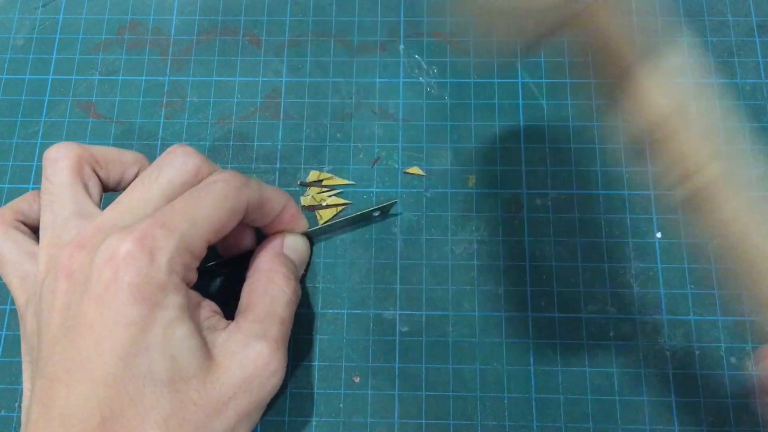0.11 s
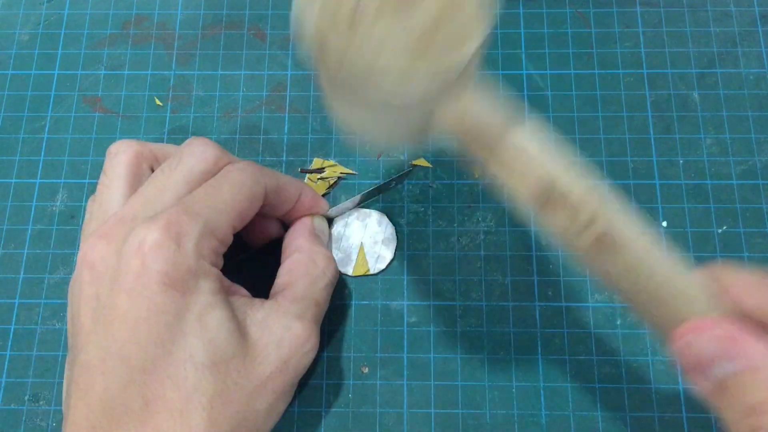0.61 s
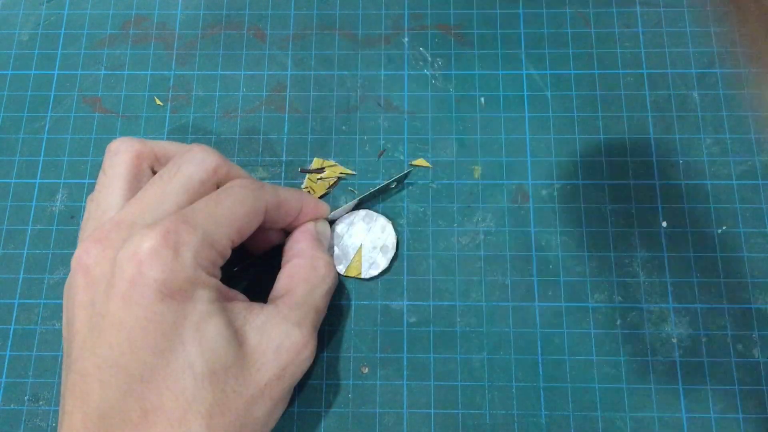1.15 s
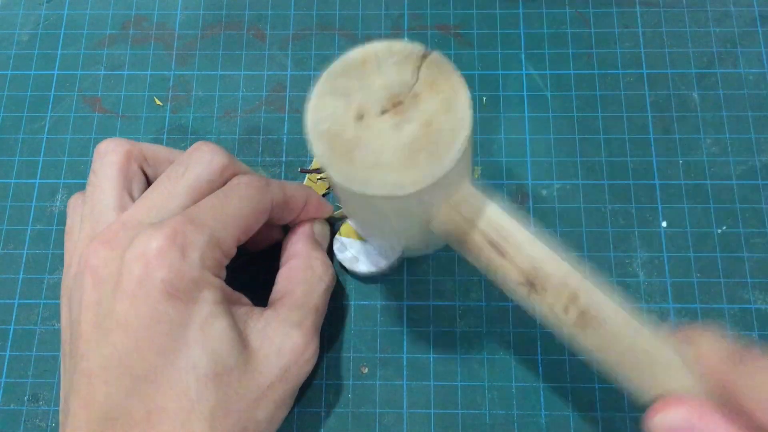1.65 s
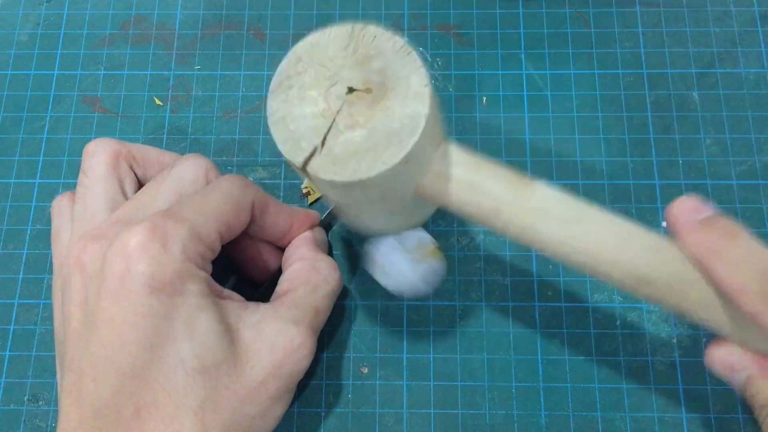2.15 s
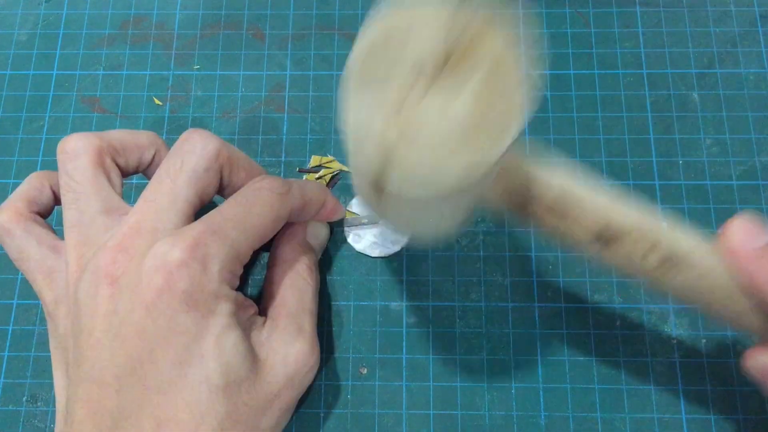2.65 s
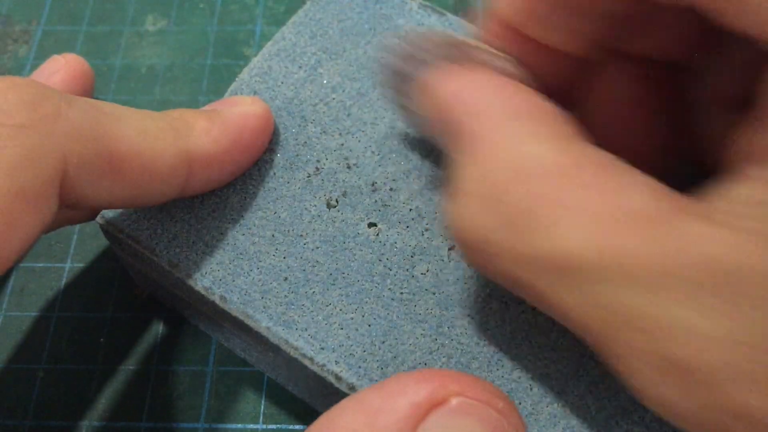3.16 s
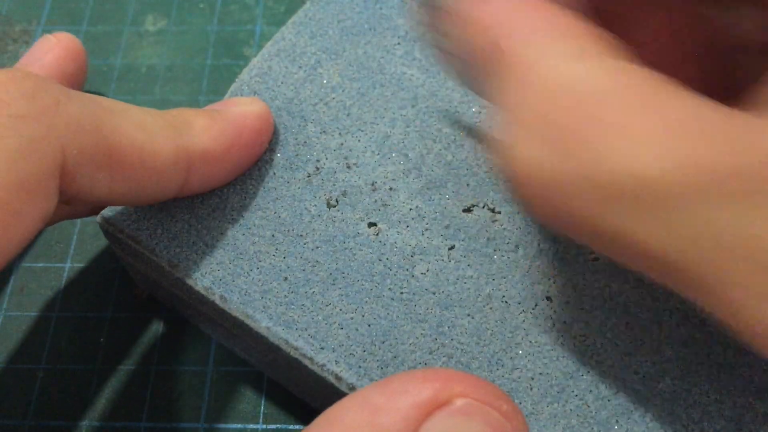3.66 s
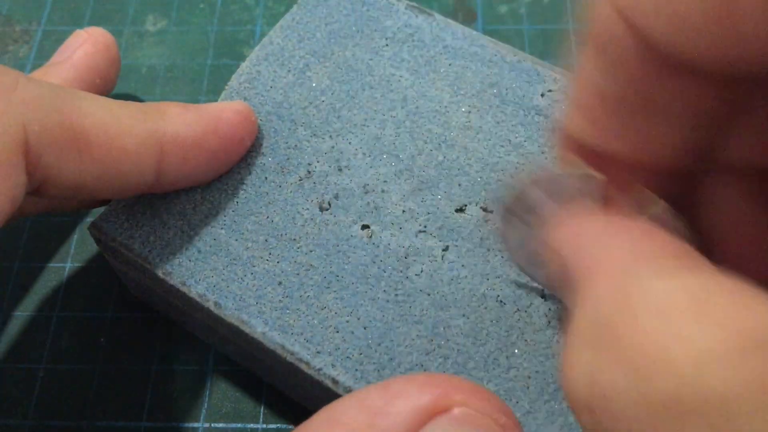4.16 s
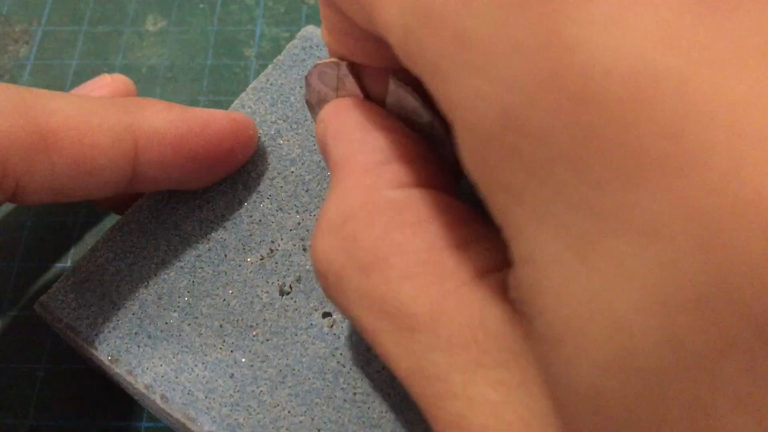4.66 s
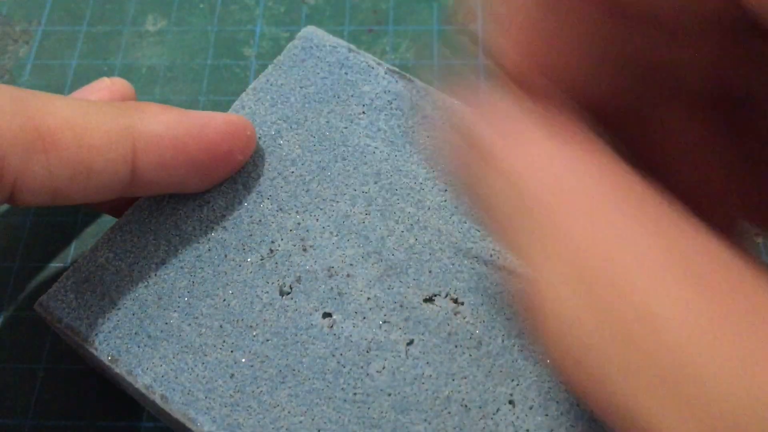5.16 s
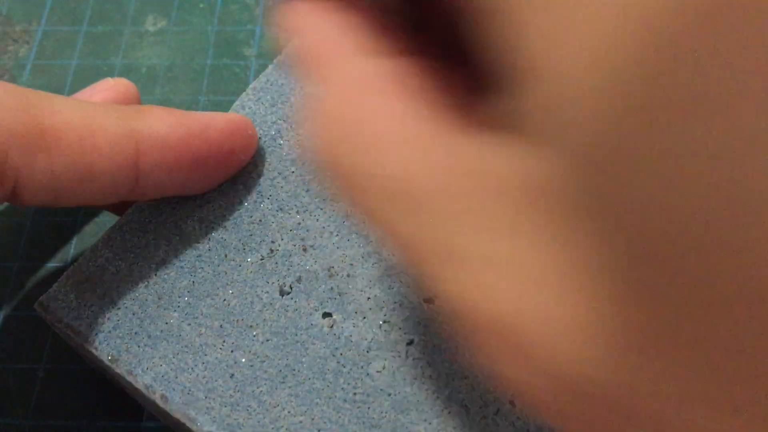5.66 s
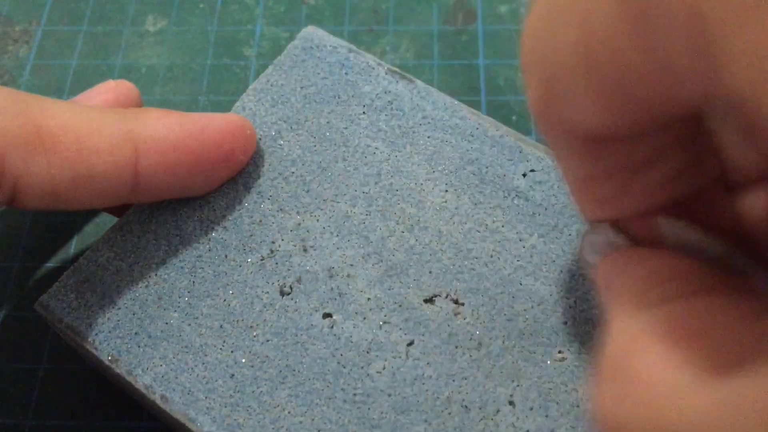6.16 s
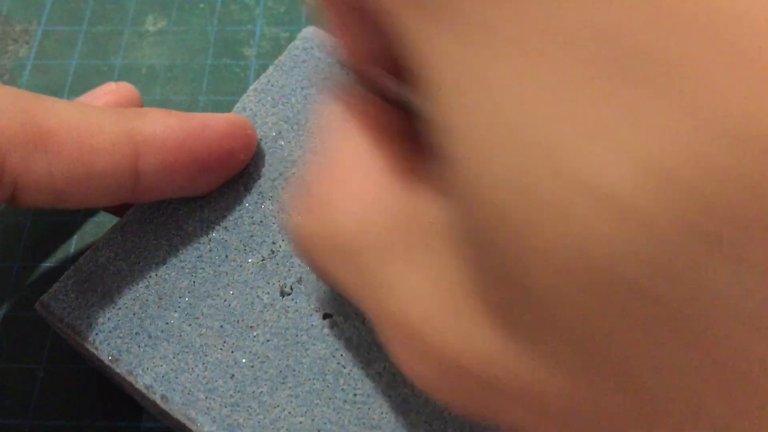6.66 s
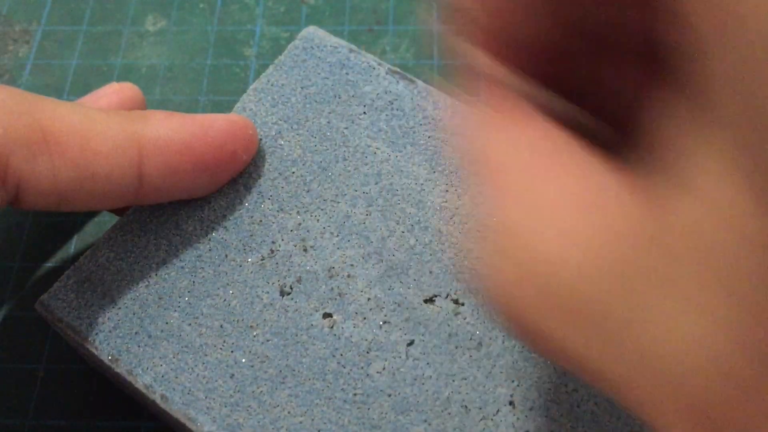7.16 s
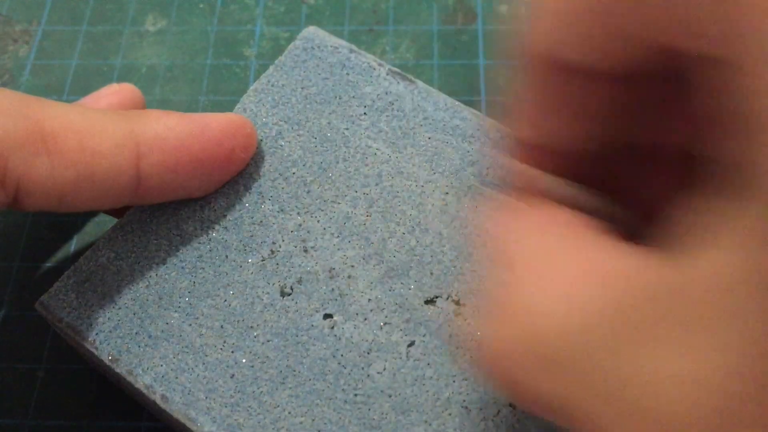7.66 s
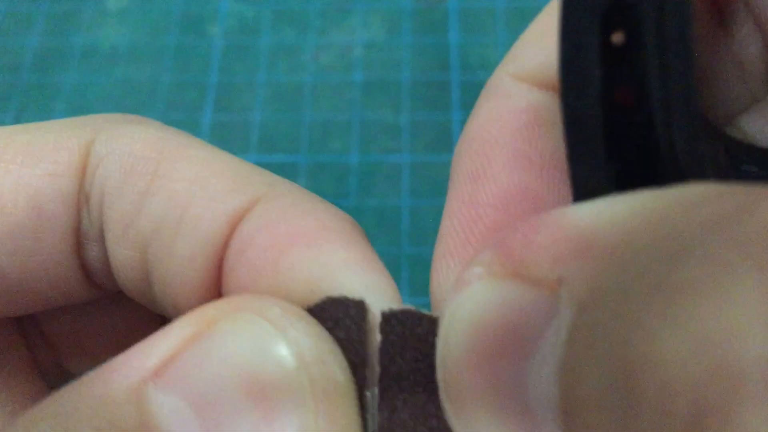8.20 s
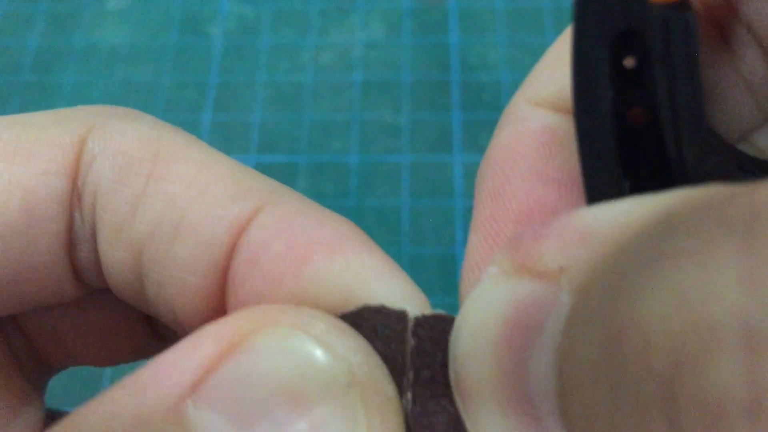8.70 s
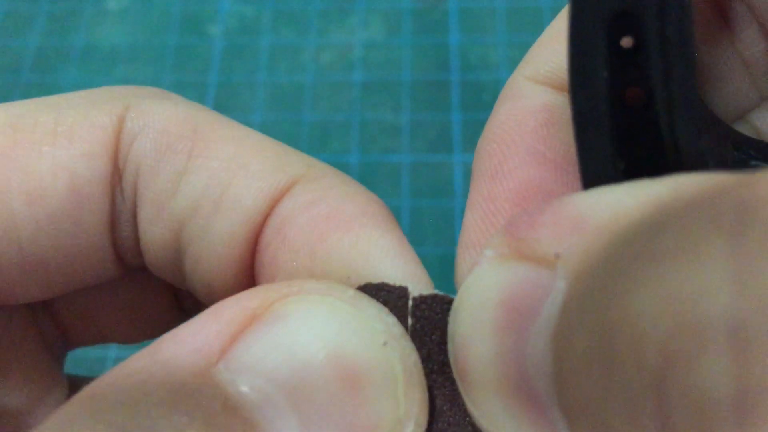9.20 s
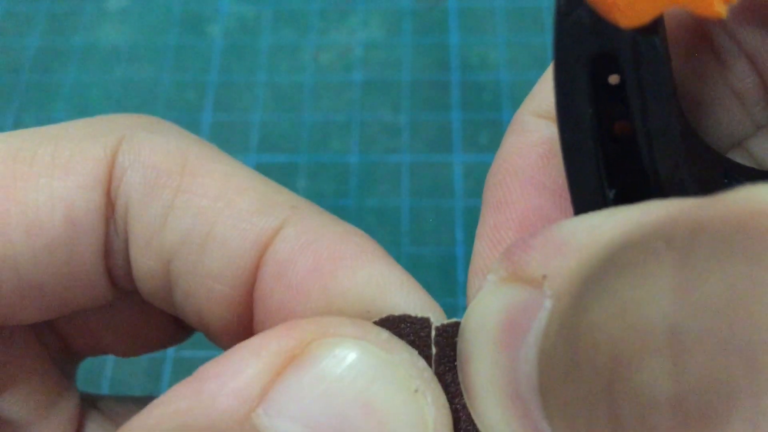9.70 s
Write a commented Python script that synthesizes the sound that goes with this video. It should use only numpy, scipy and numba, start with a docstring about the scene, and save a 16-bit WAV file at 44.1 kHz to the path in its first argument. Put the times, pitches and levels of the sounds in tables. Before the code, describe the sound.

Close up in a hard, reverberant room, eight loud mallet blows knock and crack through nearly three seconds, flattening at the microphone's limit and chopped by abrupt cuts. A small edge then rasps over stone in brisk separate strokes, grainy and dry with hissy, brightening ends, small clicks and soft low bumps. After about eight seconds the rubbing stops, leaving a very quiet low room murmur.

```python
"""Hard wooden blows crack and ring in short shots cut together, then an edge rasps stroke by stroke,
last the quiet room alone. A mallet drives a blade into a small disc on a work table: noise cracks, decaying
sines, a quick decay and a long, slowly fading tail. The disc's edge is drawn over a sharpening stone: grainy
noise through moving resonances. A close phone microphone hears it in a hard-walled room; the blows overload it."""
import sys
import numpy as np
from scipy import signal
from scipy.fft import rfft, irfft, next_fast_len
from scipy.io import wavfile
from scipy.ndimage import uniform_filter1d
from numba import njit

SR = 44100
rng = np.random.default_rng(int(sys.argv[2]) if len(sys.argv) > 2 else 0)


def gain_from_db(level_db):
    """Turn a decibel level (scalar or array-like) into a linear amplitude factor."""
    decades = np.asarray(level_db, float) / 20
    return 10 ** decades


def unload_audio(sound):
    """Save the sound as a 16-bit wav file, at the path given as the first command line argument."""
    columns = np.transpose(np.atleast_2d(sound))
    # keep every value between -1 and 1, then stretch to whole-number steps
    steps = np.round(np.clip(columns, -1, 1) * 32767)
    wavfile.write(sys.argv[1], SR, steps.astype(np.int16))


N = 433062
T = np.arange(N) / SR

# modes of mallet, blade and table top: (frequency [Hz], level [dB], t60 [s])
TABLE_MODES = [(104, -2.5, 0.28), (139, -14.5, 0.15), (220, 0, 0.23), (263, -6, 0.36), (385, -4.5, 0.14),
               (384, -9, 0.1506), (500, -6, 0.045), (573, -10, 0.071), (640, 1.5, 0.096), (745, 2.5, 0.053),
               (942, 9, 0.044), (1256, -2, .07), (1305, 0, 0.062), (1477, -2.5, 0.046), (1810, 6.5, 0.028),
               (2160, -6, .05), (2360, -14.5, 0.025), (2808, -12.5, 0.0092)]
# colour of the quick decay after a blow: (frequency [Hz], level [dB])
QUICK_COLOUR = [(29, -44), (50, -12.5), (103, -1.5), (167, -13.5), (277, -1.5), (389, -5.5), (532, -1),
                (765, -7), (1500, -7.5), (2160, -13), (2560, -22.5), (8750, -33), (16000, -45)]
# colour of the long tail after a blow: (frequency [Hz], level [dB])
LONG_COLOUR = [(29, -38), (50, -25), (81, -5.5), (171, -10), (218, -0.5), (337, -5), (371, -0.5),
               (450, -14), (559, -6), (2270, -19.5), (3410, -32), (8140, -37), (16000, -73.5)]
# bounds of the shots at the stone: (time [s])
STONE_CUTS = [0, 4.708, 5.705, 6.948, 8.2]


def unit(x):
    """Scale to rms 1."""
    return x / np.sqrt(np.mean(x ** 2))


def read(table, hz):
    """Read a table of (frequency [Hz], value) on a log-frequency axis."""
    f, v = np.transpose(table)
    return np.interp(np.log(np.maximum(hz, 1)), np.log(f), v)


def shape(x, table):
    """Filter by points of (frequency [Hz], gain [dB])."""
    size = next_fast_len(len(x))
    gain = gain_from_db(read(table, np.fft.rfftfreq(size, 1 / SR)))
    return irfft(rfft(x, size) * gain, size)[:len(x)]


def colour(x, table):
    """Filter, then scale to rms 1."""
    return unit(shape(x, table))


def noise(table, size):
    """Noise of the given colour, rms 1."""
    return colour(rng.standard_normal(size), table)


def tail(table, t60, size):
    """Decaying noise: overlapping half-octave bands, each dying at its own rate."""
    spectrum = rfft(noise(table, size))
    hz, t = np.fft.rfftfreq(size, 1 / SR), T[:size]
    place = 2 * np.log2(np.maximum(hz, 40) / 40)  # half octaves above 40 Hz
    out = np.zeros(size)
    for k in range(19):
        centre_hz = 40 * 2 ** (k / 2)
        band = irfft(spectrum * np.maximum(1 - abs(place - k), 0), size)
        out += band * gain_from_db(-60 * t / read(t60, centre_hz))
    return out


def add(out, s, x, end_s):
    """Mix x in from time s, fading fast ahead of the cut at end_s."""
    i = int(s * SR)
    size = min(len(x), len(out) - i)
    out[i:i + size] += x[:size] * np.clip((end_s - T[i:i + size]) / 0.0087, 0, 1)


def walk(rate):
    """Random values, rate of them a second, joined by straight ramps; spread near 1."""
    k = int(SR / rate)
    return uniform_filter1d(np.repeat(rng.standard_normal(N // k + 1), k), k)[:N]


@njit
def svf(x, hz, width):
    """Band-pass with a moving centre, gain 1 there; width in Hz."""
    y, b, l = np.empty(len(x)), 0., 0.
    for i in range(len(x)):
        g, k = np.tan(np.pi * hz[i] / SR), width / hz[i]
        v = (b + g * (x[i] - l)) / (1 + g * (g + k))
        b, l, y[i] = 2 * v - b, l + 2 * g * v, k * v
    return y


def mallet():
    """Each shot opens on a lingering ring; the cut chops every tail."""
    # blows: (time [s], level [dB], crack [dB], thud [dB], hardness [dB])
    blows = [(0.047, -5, -11.5, -18, 7), (0.473, -6.5, -13, -15.5, 7.5), (0.726, -7.5, -10, -12.5, 1.5),
             (1.076, -6.5, -11.5, -15.5, -5.5), (1.485, -4.5, -11.5, -17.5, 2),
             (1.728, -6, -14.5, -15.5, 0.5), (2.211, -8, -11.5, -14.5, -1.5),
             (2.641, -5.5, -20.5, -16.5, -2.5)]
    # shots: (start [s], lingering ring [dB], its treble [dB], brightness of the blow [dB], stutter [dB])
    shots = [(0, -39, -3.5, 3.5, -21), (0.447, -43, -7.5, 1, -27), (0.611, -42, -15.5, 0, -30),
             (0.704, -43, -0.5, 3, -28.5), (1.032, -41, -11.5, 2, -32.5), (1.44, -48, -5.5, -1, -22),
             (1.701, -45.5, -3, -2.5, -26), (2.114, -61.5, -10.5, 0, -30), (2.187, -49.5, 1, 3, -27.5),
             (2.618, -45, -3.5, -9, -37)]
    # two faint early copies of every blow: (lead [s], level over the shot's stutter [dB], fade [s])
    stutter = [(0.02, 0, .006), (.012, -3, .006)]
    stone_start_s = 2.866
    out = np.zeros(N)
    cuts = np.array([row[0] for row in shots] + [stone_start_s])

    for (s, db, treble_db, *_), end_s in zip(shots, cuts[1:]):
        ring = colour(noise(LONG_COLOUR, size=8192), [(400, 0.0069), (1500, treble_db)])
        t = T[:len(ring)]
        add(out, s, gain_from_db(db - 60 * t / 1.8) * ring * np.minimum(t / .006, 1), end_s)

    for s, db, *kind in blows:
        shot = np.searchsorted(cuts, s) - 1
        bright_db, stutter_db = shots[shot][3:]
        hit = gain_from_db(db) * blow(*kind, bright_db)
        add(out, s, hit, cuts[shot + 1])
        for ahead_s, copy_db, fade_s in stutter:
            dull = shape(hit[:2048], [(2000, -2), (4000, -7)])
            add(out, s - ahead_s, gain_from_db(stutter_db + copy_db) * dull * np.exp(-T[:2048] / fade_s), s)
        # a faint rush of noise rises for 23 ms before the blow
        rush = colour(noise(QUICK_COLOUR, size=1024),
                      [(150, -21.0), (400, -0.5), (1800, 1.5), (2800, 3), (3600, -18.5)])
        rise = np.exp((T[:1024] - T[1024]) / 0.0062)
        add(out, s - T[1024], gain_from_db(db - 24.0) * rush * rise, 10)
    return out


def blow(crack_db, thud_db, hard_db, bright_db):
    """Steel crack, wooden ring, then a quick decay and a long, slowly fading tail."""
    # colour of the crack: (frequency [Hz], level [dB])
    crack_colour = [(880, -32.5), (1500, 0), (3810, -10.5), (5600, -14.5), (6890, -21), (10800, -19.5),
                    (12700, -21), (16000, -30.5)]
    # fading of the quick decay: (frequency [Hz], t60 [s])
    quick_t60 = [(60, 0.38), (400, 0.32), (1100, .3), (3000, 0.29), (8000, 0.3), (16000, 0.57)]
    # fading of the long tail: (frequency [Hz], t60 [s])
    long_t60 = [(60, 5.3), (400, 4.5), (1100, 2.6), (3000, 1.5), (8000, 0.88), (16000, .5)]
    size = 24576
    t = T[:size]
    # a harder landing shifts the ring from the wood's low modes to the upper ones
    hard = [(600, 0.0065), (1050, -.4 * hard_db), (1500, hard_db), (2300, hard_db), (3500, bright_db)]

    # every blow lands a little differently: own strengths and phases
    hz, db, t60 = np.transpose(TABLE_MODES)[:, :, None]
    scatter_db, turn = rng.standard_normal((2, len(hz), 1))
    thud = np.where(hz < 300, thud_db + 11.5, 0)
    db = db + 2.0 * scatter_db + thud + read(hard, hz)
    modes = gain_from_db(db - 60 * t / t60) * np.sin(2 * np.pi * hz * t + 2 * turn)
    ring = gain_from_db(-13.5) * np.sum(modes, axis=0) * (1 - np.exp(-t / 0.00042))

    crack_fade = np.exp(-t / 0.0013) + 0.14 * np.exp(-t / .006)
    crack = gain_from_db(crack_db + 14) * noise(crack_colour, size) * crack_fade * np.minimum(t / 0.0018, 1) ** 2
    # the blade bites a moment after the wood lands
    bite = gain_from_db(crack_db + 10.0) * rng.standard_normal(size) * np.exp(-abs(t - .0012) / 0.00021)

    quick_colour = [(f, g + read(hard, f)) for f, g in QUICK_COLOUR]
    long_colour = [(f, g + read(hard, f)) for f, g in LONG_COLOUR]
    quick_decay = gain_from_db(-13.5) * tail(quick_colour, quick_t60, size) * (1 - np.exp(-t / 0.0053))
    long_tail = gain_from_db(-29.5) * tail(long_colour, long_t60, size) * (1 - np.exp(-t / .03))
    hum = gain_from_db(-34 - 60 * t / 1.2) * shape(table_hum(size), hard) * (1 - np.exp(-t / 0.027))
    return ring + crack + bite + quick_decay + long_tail + hum


def table_hum(size):
    """Narrow noise at each table mode, rms 1."""
    hz = np.fft.rfftfreq(size, 1 / SR)
    peaks = sum(gain_from_db(db) / (1 + ((hz - f) / (6 + .012 * f)) ** 2) for f, db, _ in TABLE_MODES)
    return unit(irfft(rfft(noise(LONG_COLOUR, size)) * peaks, size))


def stone_shots():
    """Strokes, touches and catches with the room's reverberation, chopped at the cuts; knocks and drone dry."""
    # faint ticks as blade or disc touch down: (time [s], level [dB], ring [Hz])
    touches = [(1.01, -38, 860), (2.107, -25, 1580), (2.111, -38, 2400), (2.498, -41, 1420),
               (3.168, -37.5, 1030), (3.196, -26, 915), (3.505, -26, 1200), (3.787, -41.5, 4200),
               (4.358, -37, 1290), (4.688, -31.5, 970), (4.753, -47, 1210), (5.021, -34, 1320),
               (5.039, -35, 1030), (5.347, -36, 1290), (5.651, -31, 1150), (5.811, -28.5, 1086),
               (6.101, -47, 1260), (6.416, -36, 1260), (6.734, -34, 1200), (7.033, -44, 900),
               (7.359, -33, 1290), (7.652, -36, 1270), (7.939, -38, 1330)]
    # coarse grains that catch the edge: (time [s], level [dB], ring [Hz])
    catches = [(2.878, -25, 1793), (2.916, -21.5, 1785), (2.98, -21, 2490), (3.229, -24, 2930),
               (3.324, -27.5, 2390), (3.521, -18, 2905), (3.55, -17.5, 1107), (3.62, -25, 3800),
               (3.941, -27, 1446), (4.229, -37.5, 2346), (4.413, -26.5, 3164), (4.708, -38, 3290),
               (4.878, -31.5, 2410), (5.067, -22, 1070), (5.358, -28, 1130), (5.474, -26, 2600),
               (5.828, -27.5, 2930), (6.485, -21.5, 4600), (6.91, -35, 2360), (7.789, -26.5, 2345),
               (7.821, -28.5, 2310), (7.99, -23.5, 1300)]
    near = strokes() + ticks(touches, click_db=-15) + ticks(catches, click_db=-5)
    room = stone_room()
    out = knocks() + drone()
    for start_s, end_s in zip(STONE_CUTS, STONE_CUTS[1:]):
        part = near * (T >= start_s) * (T < end_s)
        add(out, 0, part + signal.fftconvolve(part, room)[:N], end_s)
    return out


def strokes():
    """Dense grains of the stone catch the edge: a low body ring, a rising upper and top ring, rasp, hiss, bite."""
    # disc and stone under the fingers: (frequency [Hz], width [Hz], level [dB])
    disc_modes = [(613, 200, -8), (918, 93, -3.5), (1164, 230, -2.5), (1374, 78, -2), (1590, 250, -8),
                  (3055, 420, -5), (3760, 220, -11)]
    # colour of the rasp: (frequency [Hz], level [dB])
    rasp_colour = [(150, -5), (350, -4.5), (600, 2.5), (1150, -4), (1450, 6), (1900, -16), (3300, 0.5),
                   (4200, -22), (9000, -57.5)]
    # colour of the hiss: (frequency [Hz], level [dB])
    hiss_colour = [(2060, -35.5), (3500, -5.5), (4540, -9), (5360, -5.5), (8000, -6), (10300, -6.5),
                   (11100, -2.5), (13300, -5.5), (14900, 0), (16000, -31.5)]
    gains, done = hand()
    judder_db = 2.2 * walk(130) + 1.8 * walk(350)

    # each mode's level wanders at random, so it comes and goes in patches
    body = np.zeros(N)
    for f, width, db in disc_modes:
        mode = svf(grains(judder_db), f * (1 + 0.021 * walk(14)), float(width))
        body += gain_from_db(db + 1.5 * walk(25)) * unit(mode)
    body = unit(body)

    # the broad rasp needs both rings going: it is weak while the stroke starts
    rasp = gain_from_db(-8.5) * np.sqrt(gains[0] * gains[1]) * colour(grains(judder_db), rasp_colour)

    start_hz, end_hz = 2140, 2190  # the upper ring's glide, ahead of its wander
    hz = (start_hz + (end_hz - start_hz) * done) * (1 + 0.091 * walk(40))
    push = grains(judder_db)  # upper and top ring share their grains
    upper = unit(svf(svf(push, hz, 830.0), hz, 760.0))
    top = unit(svf(svf(push, 2.33 * hz, 730.0), 1.56 * hz, 730.0))
    hiss = colour(grains(judder_db), [(2500, -50.0)] + list(hiss_colour))

    # a narrow ring as the edge digs in
    bite_hz = 1200 * (1 + .08 * walk(30))
    bite = unit(svf(svf(grains(judder_db), bite_hz, 480.0), bite_hz, 480.0))
    return rasp + np.sum(gains * [body, upper, hiss, top, bite], axis=0)


def hand():
    """Pressure and speed set the gains of body, upper ring, hiss, top ring and bite; also the share of stroke done."""
    # strokes: (start [s], length [s], body [dB], upper ring [dB], share where the hand is fastest)
    stroke_table = [(2.864, 0.17, -41, -35.5, 0.57), (3.186, 0.18, -38.5, -37.5, 0.48),
                    (3.501, 0.16, -39, -37.5, 0.46), (3.81, 0.14, -35.5, -33.5, 0.52),
                    (4.107, 0.15, -41, -33.5, 0.43), (4.389, 0.13, -41, -33, 0.54),
                    (4.672, 0.12, -52.5, -47, 0.49), (4.745, 0.14, -44.5, -43.5, 0.46),
                    (5.021, .168, -41, -36, 0.54), (5.339, 0.17, -43.5, -37, 0.46),
                    (5.648, 0.1, -42, -49.5, 0.39), (5.792, 0.14, -38.5, -32, .65),
                    (6.102, 0.17, -40.5, -35.5, 0.52), (6.418, 0.16, -40.5, -33, 0.45),
                    (6.73, 0.18, -40, -33, 0.47), (7.053, 0.16, -45, -34, 0.63),
                    (7.355, 0.15, -43, -34, 0.51), (7.656, 0.17, -41, -33, 0.44),
                    (7.977, 0.16, -40.5, -30.5, 0.4)]
    # the grip changes from shot to shot: (start [s], hiss offset [dB], top over upper ring [dB],
    # bite over body [dB])
    grips = [(2.8, -2, -12, 1.5), (4.6, 0.5, -5.5, 4.5), (5.75, -1, -5, 5), (7.0, -0.5, -6, 2)]
    land_s, lift_s = 0.011, 0.029  # pressure comes on and lets go
    creep = 0.13  # speed at the ends of a stroke, share of the top speed
    body_power, upper_power, hiss_power, top_power = .2, 2.05, 0.98, 2  # gain grows as speed to this power
    bite_at, bite_width = 0.24, 0.12  # shares of the stroke
    gains, done = np.zeros((5, N)), np.zeros(N)
    for s, length, body_db, upper_db, fastest in stroke_table:
        cut_s = STONE_CUTS[np.searchsorted(STONE_CUTS, s)]
        i = slice(int(s * SR), int(min(s + length, cut_s) * SR))
        t = T[i] - s
        share = np.clip(t / length, 0, 1)
        pressure = (np.clip(t / land_s, 0, 1) * np.clip((length - t) / lift_s, 0, 1)) ** 2
        speed = creep + (1 - creep) * np.sin(np.pi * share ** (np.log(.5) / np.log(fastest)))
        _, hiss_db, over_db, bite_db = [grip for grip in grips if grip[0] <= s][-1]
        # the hiss level lies between body and upper ring
        hiss_db = hiss_db + body_db + .4 * (upper_db - body_db)
        # the upper and top rings grow along the stroke as the edge tips up
        upper_db = upper_db + 7.5 * (share - fastest)
        top_db = upper_db + over_db
        bite_shape = np.exp(-((share - bite_at) / bite_width) ** 2)
        gains[:, i] = pressure * [gain_from_db(body_db) * speed ** body_power,
                                  gain_from_db(upper_db) * speed ** upper_power,
                                  gain_from_db(hiss_db) * speed ** hiss_power,
                                  gain_from_db(top_db) * speed ** top_power,
                                  gain_from_db(body_db + bite_db) * bite_shape]
        done[i.start:] = 1
        done[i] = share
    return gains, done


def grains(judder_db):
    """Noise whose grain sizes have a long tail, under the shared judder of the hand and patches of its own."""
    sizes = gain_from_db(2.3 * rng.exponential(size=N))
    return rng.standard_normal(N) * sizes * gain_from_db(2.0 * walk(60) + judder_db)


def ticks(table, click_db):
    """A sharp click, a few cycles of ring and a rustle around the same pitch."""
    out, t = np.zeros(N), T[:512]
    for s, db, hz in table:
        click = gain_from_db(click_db) * rng.standard_normal(len(t)) * np.exp(-t / .0007)
        ring = .45 * np.sin(2 * np.pi * hz * t) * np.exp(-t / .002) * np.minimum(t / .0006, 1)
        rustle_colour = [(hz / 2, -20), (hz, 0), (3 * hz, -6), (6 * hz, -25)]
        rustle = 0.31 * noise(rustle_colour, len(t)) * np.exp(-t / .002)
        add(out, s, gain_from_db(db) * (click + rustle + ring), 10)
    return out


def stone_room():
    """Impulse response of the room around the stone: decaying noise bands scaled to a set energy."""
    # colour: (frequency [Hz], level [dB])
    room_colour = [(100, -8), (500, -1), (2500, -3.5), (4000, -2), (9000, -4), (16000, -10.5)]
    # decay: (frequency [Hz], t60 [s])
    room_t60 = [(100, .7), (1000, 0.46), (3000, 0.26), (8000, 0.21), (16000, .25)]
    room = tail(room_colour, room_t60, size=24576)
    return gain_from_db(-14.5) * room / np.sqrt(np.sum(room ** 2))


def knocks():
    """The stone knocks the table as the disc lands: two low table modes under a soft push."""
    # knocks: (time [s], relative level [dB])
    knock_table = [(3.517, -48), (3.781, -53), (4.121, -49), (5.025, -52), (5.35, -50), (5.655, -42),
                   (5.806, -44.5), (6.11, -48.5), (6.428, -47), (6.744, -48), (7.041, -53), (7.54, -60.5),
                   (7.786, -58), (8.019, -52)]
    out, t = np.zeros(N), T[:8192]
    for s, db in knock_table:
        thump = np.sin(2 * np.pi * 100 * t) * np.exp(-t / 0.021)
        thump += 0.37 * np.sin(2 * np.pi * 62 * t) * np.exp(-t / 0.036)
        add(out, s, gain_from_db(db + 7.5) * thump * (1 - np.exp(-t / 0.0078)), 10)
    return out


def drone():
    """A low drone that passes: a narrow wavering band of noise."""
    # path: (time [s], level [dB], pitch ahead of the waver [Hz])
    path = [(5.66, -61, 296), (5.696, -52.5, 316), (5.878, -56.5, 297), (6.508, -53, 313),
            (6.704, -60, 304), (6.868, -61.5, 310), (7.02, -67, 302)]
    s, db, hz = np.transpose(path)
    hz = np.interp(T, s, hz) * (1 + 0.042 * walk(13))
    band = unit(svf(svf(rng.standard_normal(N), hz, 53.0), hz, 45.0))
    return band * gain_from_db(np.interp(T, s, db)) * (T > s[0]) * (T < s[-1])


def floor():
    """Air and far traffic in the room: coloured noise whose level drifts."""
    # colour: (frequency [Hz], level [dB])
    air_colour = [(15, -57), (25, -35.5), (55, -7), (114, -2.5), (161, -9.5), (190, -3), (249, -7),
                  (270, -2), (344, -18), (373, -10), (451, -15.5), (5000, -30), (12500, -35.5),
                  (15500, -39), (16500, -50)]
    # course ahead of the drift: (time [s], level [dB])
    course = [(2.9, -63), (5.04, -60.5), (6.64, -61.5), (8.051, -63.5), (9.82, -63.5)]
    s, db = np.transpose(course)
    return noise(air_colour, N) * gain_from_db(np.interp(T, s, db) + 0.72 * walk(6.6))


def scene():
    """Mallet shots, stone shots with their room, the floor under all."""
    return (mallet() + stone_shots() + floor())[None]


def roll_off(x):
    """The treble ends steeply here."""
    return signal.sosfilt(signal.butter(12, 16970, fs=SR, output="sos"), x)


def record(dry):
    """The microphone cuts the deepest bass and dips in the treble; the blows flatten against the input's ceiling."""
    # microphone response: (frequency [Hz], gain [dB])
    response = [(20, -15.5), (50, 0.5), (8500, 0.5), (9600, 1), (10500, -3.5), (11300, -1)]
    ceiling, knee = .35, 14.0  # full scale = 1; a higher knee bends more sharply
    heard = shape(dry[0], response)[None]
    mix = heard / (1 + abs(heard / ceiling) ** knee) ** (1 / knee)
    return roll_off(mix)


dry = scene()
out = record(dry)
unload_audio(out)
```